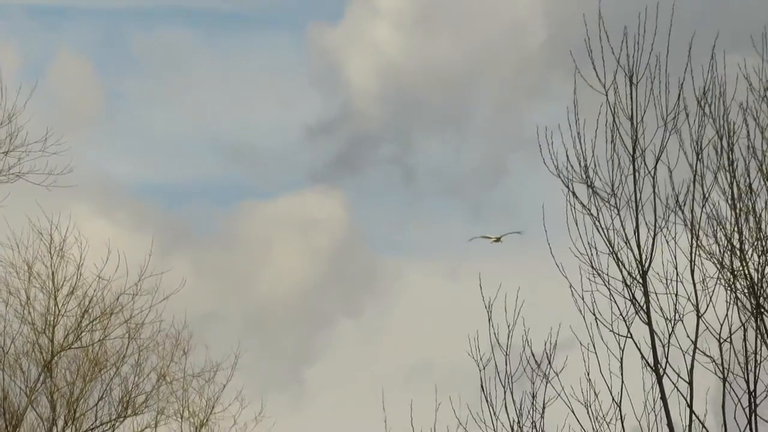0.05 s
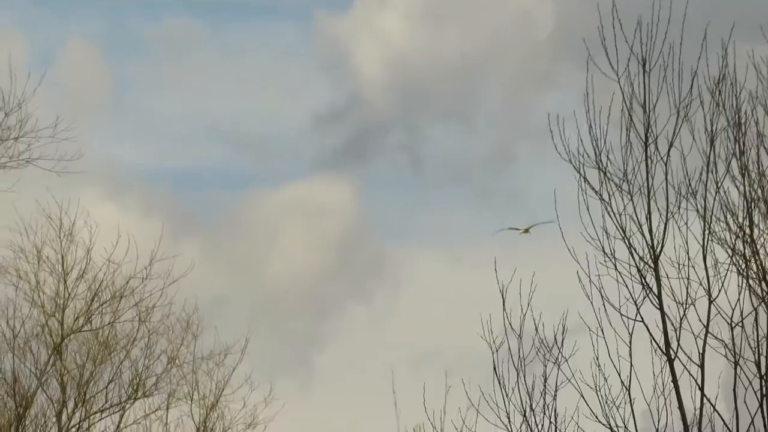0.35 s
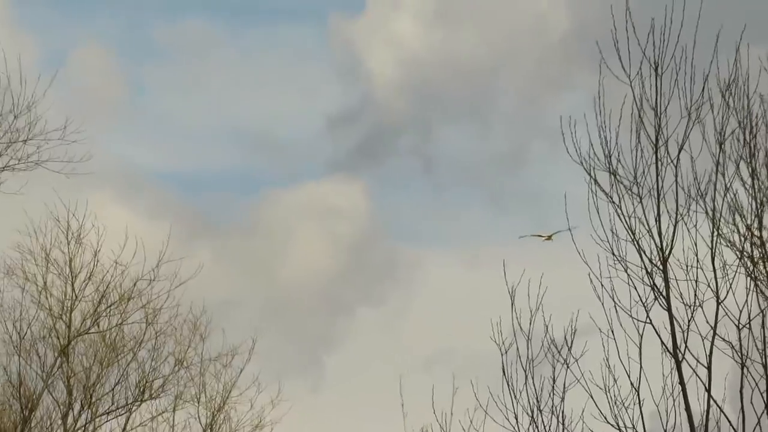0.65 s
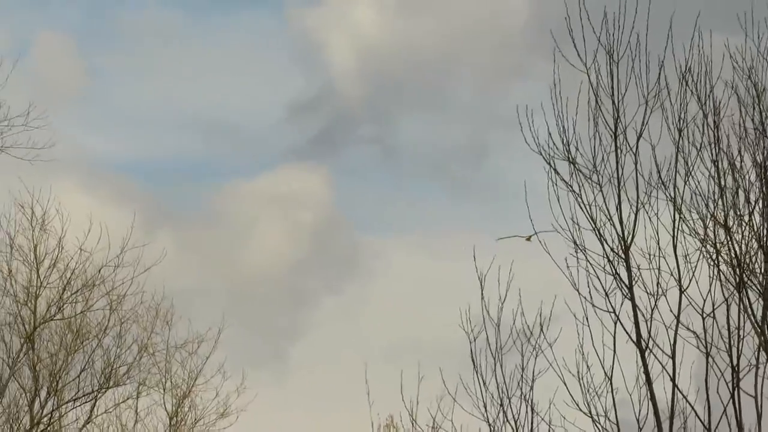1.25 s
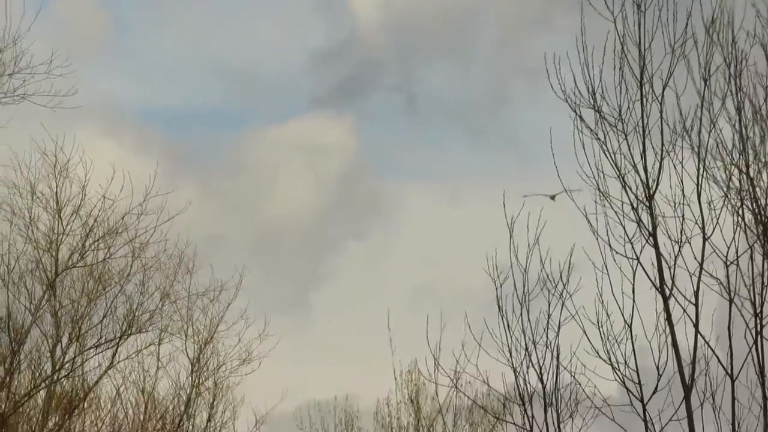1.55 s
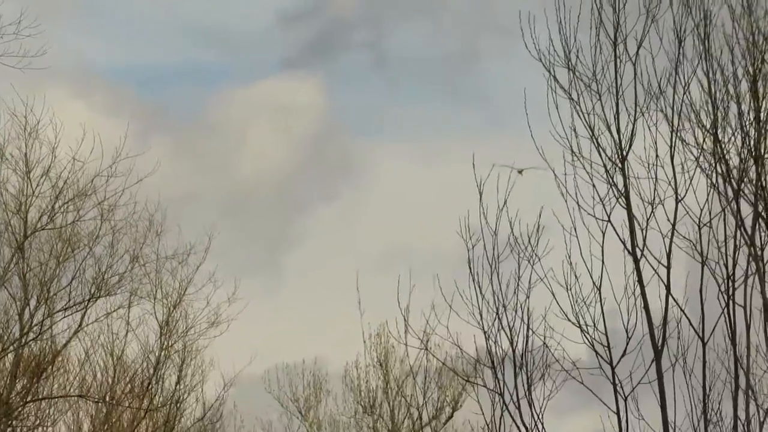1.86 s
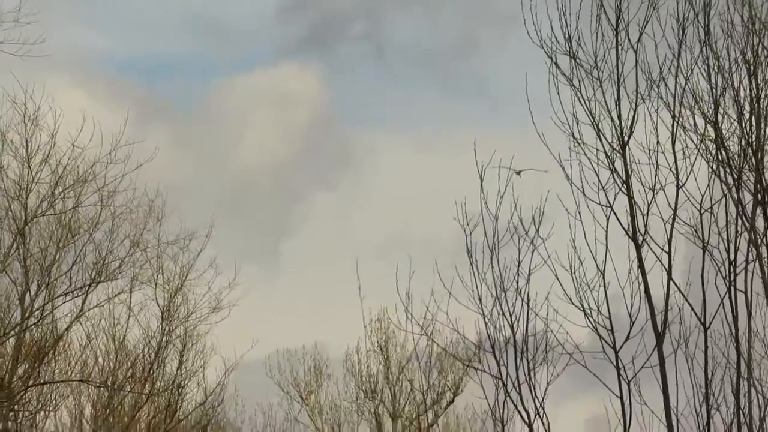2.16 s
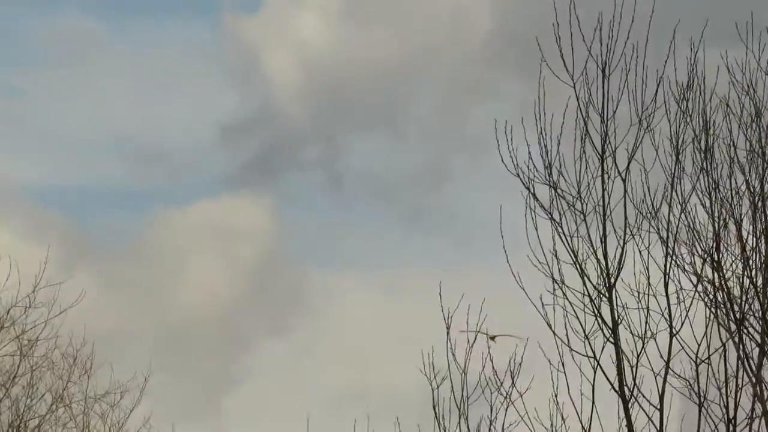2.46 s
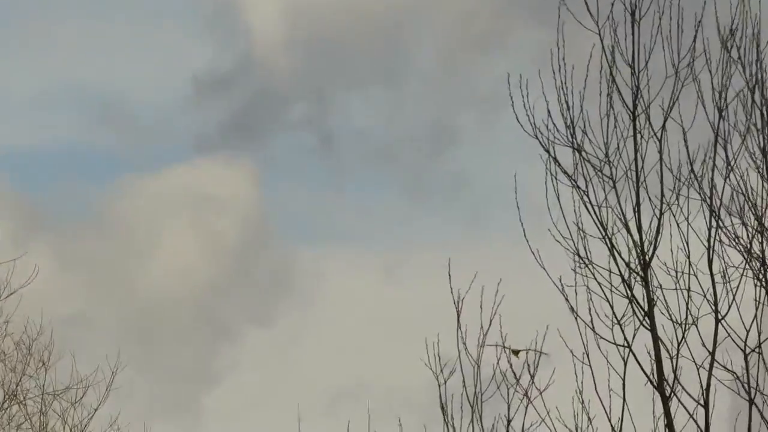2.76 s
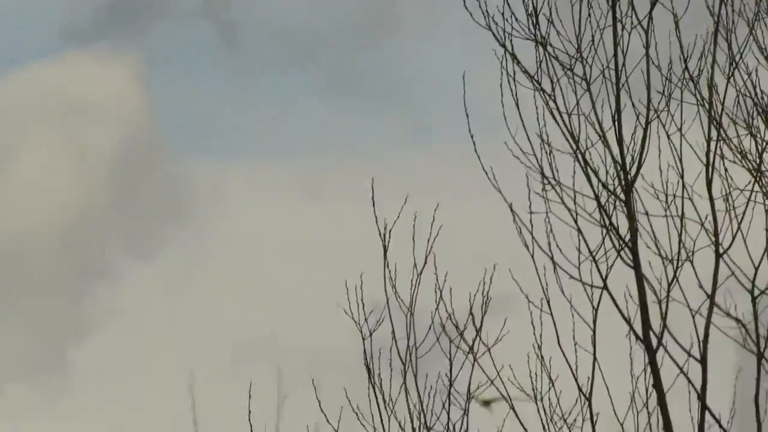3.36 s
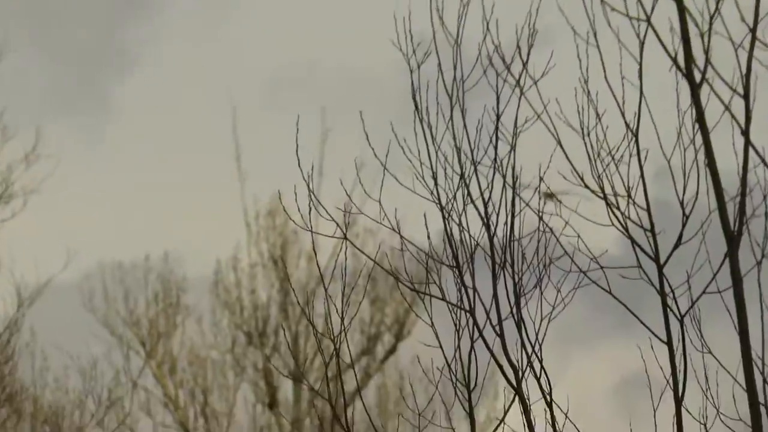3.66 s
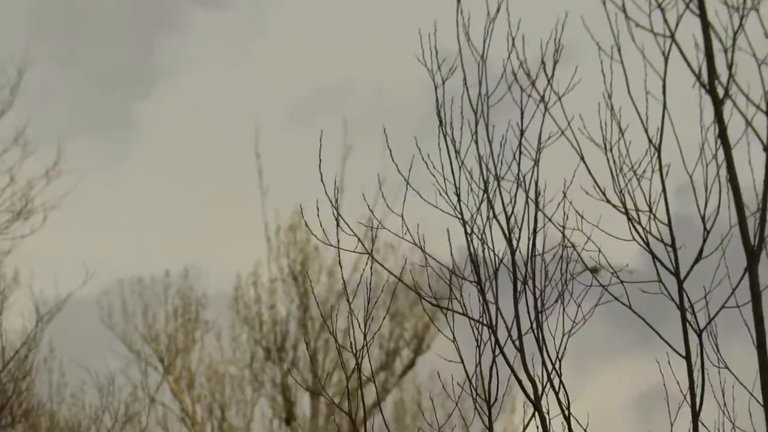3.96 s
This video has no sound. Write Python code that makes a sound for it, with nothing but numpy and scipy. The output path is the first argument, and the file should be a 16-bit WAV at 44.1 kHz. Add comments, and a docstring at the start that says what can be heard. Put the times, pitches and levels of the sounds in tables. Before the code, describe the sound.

Birds call among bare trees: a small one close by gives sharp chirps, then a run of ticks, while a distant one repeats a low falling call. Thin whistles and a brief trill sit over a steady far-off rush.

```python
"""A small bird close by scolds in sharp chips, later ticks: steep down-sweeps shaped by its beak.
Among bare trees, a distant bird repeats a low falling call that echoes off the tree line.
Other birds add thin whistles, a fast trill and rising slurs, all gliding tones.
Under it lie a steady far-off rush, a few soft bumps, a light ringing knock and a faint hiss."""
import sys
import numpy as np
from scipy import signal
from scipy.fft import rfft, irfft
from scipy.io import wavfile

SR = 44100
rng = np.random.default_rng(int(sys.argv[2]) if len(sys.argv) > 2 else 0)


def store_pcm(level_fs):
    """Save levels as 16-bit WAV."""
    pcm = np.round(np.clip(level_fs, -1, 1) * 32767).astype(np.int16)
    wavfile.write(sys.argv[1], SR, np.atleast_2d(pcm).T)


N = 176400

# Far whistles. Each row: start and length in seconds, first, middle and last pitch in Hz,
# level in dB, waver as a share of pitch.
WHISTLES = [(-.02, 0.12, 1120, 1012, 940, -39, 0.081), (0.072, 0.22, 1012, 969, 963, -51.5, 0.02),
            (.1, 0.92, 845, 827.5, 830, -55, 0.024), (0.163, 0.36, 1440, 1437, 1430, -53, 0.012),
            (0.572, 0.11, 1430, 1398, 1392, -42.5, 0.01), (0.941, 0.11, 7300, 6710, 6810, -45.5, 0.012),
            (1.038, 0.068, 6420, 5720, 5100, -49.5, 0.16), (0.98, 0.027, 3800, 4200, 4700, -55.5, .02),
            (1.015, .16, 1600, 1707, 1610, -51, 0.019), (3.04, 0.085, 900, 943, 976, -45, 0.0094),
            (3.844, 0.14, 7300, 7090, 7250, -51, .008), (3.926, 0.044, 3500, 3920, 4200, -55.5, 0.0059)]
# Rush spectrum. Each row: frequency in Hz, relative level in dB.
RUSH_SPECTRUM = [(20, -26.5), (45, -15.5), (80, -1), (160, 1), (290, -2), (440, 3.5), (700, -1), (1100, 4),
                 (1800, -8), (3200, -12), (4500, -24.5), (6500, -34.5), (10000, -42.5), (15000, -52)]
# Rush stereo width. Each row: frequency in Hz, side against mid in dB.
RUSH_WIDTH = [(60, -24.5), (280, -13.5), (800, -12), (2000, -10.5), (4000, -10), (7000, 3.5)]
# Hiss spectrum. Each row: frequency in Hz, relative level in dB.
HISS_SPECTRUM = [(1500, 1), (4000, 3.5), (8000, -7.5), (13000, -15.5), (16000, -15)]
# Hiss envelope. Each row: time in seconds, level in dB.
HISS_LEVELS = [(0, -77), (2.1, -94), (2.4, -58), (3.2, -59.5), (4, -61)]
# Scolding chips. Each row: start and length in seconds, starting pitch in Hz, level before the beak
# in dB, relative octave level in dB, nearest reflection delay in ms.
CHIPS = [(.0733, .019, 3130, -23, -3.5, 2.1), (0.1227, .018, 3370, -26, 1.5, 3.15),
         (0.246, .016, 3180, -24.5, 0, 2.72), (0.2947, .019, 3444, -25, 1, 2.2),
         (1.3264, .016, 3225, -26, 1.5, 3.1), (1.385, .015, 3444, -27.5, 1, 2.8),
         (1.585, .014, 2983, -31.5, -2.5, 4), (1.6168, .014, 3365, -29, 4.5, 2.5),
         (2.255, 0.012, 3250, -32.5, -.5, 4.3), (2.2918, 0.0093, 3350, -30.5, 1, 3)]
# Scolding ticks. Each row: start and length in seconds, level before the beak in dB.
TICKS = [(2.347, 0.006, -36.5), (2.376, 0.0098, -37.5), (2.419, 0.006, -36), (2.44, 0.0027, -37),
         (2.464, 0.002, -32), (2.497, .009, -27.5), (2.5477, 0.0099, -28.5), (2.586, 0.013, -30.5),
         (2.6368, 0.0057, -25.5), (2.682, 0.013, -29), (2.74, 0.0084, -27), (2.78, 0.0078, -26),
         (2.83, 0.0092, -24)]
# Throat and beak response. Each row: frequency in Hz, gain in dB.
BEAK_RESPONSE = [(1400, -8.5), (2100, -28), (2750, -3), (3400, -4.5), (4400, -3.5), (5300, -7),
                 (6000, -5.5), (6600, -9), (7400, -22), (11500, -15.5)]
# Ground and branch reflections. Each row: delay in seconds, gain in dB.
NEAR_ECHOES = [(.0046, -10), (.0072, -12)]
# Bumps and clicks. Each row: start and decay scale in seconds, centre in Hz, level in dB.
BUMPS = [(0.159, 0.018, 109, -36.5), (0.358, 0.12, 91, -41), (0.911, 0.0079, 121, -31),
         (0.979, 0.014, 347, -28.5), (1.964, 0.013, 105, -33), (3.201, 0.0076, 3130, -40.5),
         (3.34, 0.042, 85, -43.5), (3.497, 0.016, 380, -35.5)]
# Low calls. Each row: start and length in seconds, starting pitch and main fall in Hz,
# level after the swell in dB, swell in dB, rasp as a share of pitch.
CALLS = [(.366, .05, 1290, 130, -31.5, 1, .014), (.592, .07, 1215, 135, -29.5, 4.5, .014),
         (.860, .087, 1220, 150, -29, 6, .014), (1.142, .088, 1245, 165, -28, 4.5, .014),
         (1.432, .082, 1240, 155, -28.5, 6, .014), (1.722, .083, 1245, 160, -28.5, 5, .014),
         (2.014, .085, 1240, 150, -29.5, 4.5, .018), (2.308, .185, 1215, 100, -36.5, 0, .035),
         (2.618, .078, 1230, 145, -29.5, 4.5, .014), (2.932, .085, 1215, 140, -29.5, 4.5, .014),
         (3.250, .092, 1200, 115, -29.5, 4.5, .018), (3.600, .1, 1190, 105, -29.5, 5, .018)]
# Call harmonics 1 to 3. Each entry: relative level in dB before the overtone swell.
CALL_HARMONICS_DB = [-1, -21, -21]
# Tree line echoes. Each row: delay in seconds, gain in dB.
TREE_ECHOES = [(.045, -19), (.092, -10), (.16, -19)]
# High notes after some calls. Each row: start and length in seconds, final pitch in Hz, level in dB.
TRAILS = [(0.683, 0.061, 3210, -50.5), (0.969, .065, 3180, -49), (1.247, 0.07, 3200, -49.5),
          (3.033, 0.071, 3150, -46.5), (3.333, .115, 3000, -47.5), (3.676, .14, 3070, -49.5)]
# Trill envelope. Each row: time in seconds, level in dB.
TRILL_LEVELS = [(1.38, -58), (1.5, -52.5), (1.68, -45), (1.8, -44.5), (1.95, -42.5), (2.08, -45),
                (2.13, -51), (2.22, -60), (2.42, -48), (2.5, -60)]
# Rising slurs. Each row: start in seconds, first and last pitch in Hz, starting level in dB.
SLURS = [(1.453, 4320, 6200, -55), (1.577, 4200, 6750, -46.5), (1.703, 4060, 6750, -49),
         (1.827, 4050, 6350, -49.5), (1.956, 3450, 6580, -45), (2.074, 3600, 6410, -45),
         (2.203, 3440, 6740, -43)]
# Knock modes. Each row: frequency in Hz, T60 in seconds, level in dB.
KNOCK_MODES = [(870, 0.049, -32), (1072, 0.052, -29), (1350, 0.043, -27.5), (1800, 0.052, -31.5),
               (3440, .04, -36)]
# Microphone port phase. Each row: frequency in Hz, lead of left over right in radians.
PORT_PHASE = [(100, 0), (1200, .22), (2300, .47), (3550, .27), (3980, -.38), (4330, -.23), (4950, -.7),
              (5450, -2.2), (6100, -3.25), (6700, -3.38), (7500, -3.15)]


def undb(db):
    """Decibels to gain."""
    return 10 ** (np.asarray(db) / 20)


def curve(at, points):
    """Linear table lookup."""
    return np.interp(at, *np.array(points, float).T)


def over_hz(hz, points):
    """Table lookup on a log frequency axis."""
    p = np.array(points, float)
    return np.interp(np.log(np.maximum(hz, 1)), np.log(p[:, 0]), p[:, 1])


def noise(spectrum):
    """Shaped noise, unit RMS."""
    x = irfft(rfft(rng.standard_normal(N)) * undb(over_hz(np.fft.rfftfreq(N, 1 / SR), spectrum)), N)
    return x / x.std()


def walk(rate_hz, n=N):
    """Random drift, spread near 1."""
    knots = rng.standard_normal(1024)
    return np.interp(np.arange(n) / SR * rate_hz, np.arange(len(knots)), knots)


def add(out, start_s, x):
    """Mix x in at start_s."""
    i = int(round(start_s * SR))
    x = x[max(-i, 0):max(N - i, 0)]
    out[max(i, 0):max(i, 0) + len(x)] += x


def span(length_s):
    """Note progress, 0 to 1."""
    return np.linspace(0, 1, max(int(length_s * SR), 2))


def gate(u, attack, release):
    """Smooth rise and fall, as shares of the note."""
    rise = np.sin(np.pi / 2 * np.clip(u / attack, 0, 1))
    fall = np.sin(np.pi / 2 * np.clip((1 - u) / release, 0, 1))
    return rise * fall


def tone(hz):
    """Gliding sine, unit RMS."""
    return np.sqrt(2) * np.sin(2 * np.pi * np.cumsum(hz) / SR)


def echoes(x, taps):
    """Sum of delayed reflections."""
    i = np.arange(N)
    return sum(undb(db) * np.interp(i - delay_s * SR, i, x, left=0) for delay_s, db in taps)


def scatter(x, t60_s, side_db):
    """Diffuse stereo reflections from trunks and twigs."""
    age = np.arange(SR) / SR / t60_s
    mid, side = rng.standard_normal((2, SR)) * 1000 ** -age * (1 - np.exp(-20 * age))
    impulse = (mid + undb(side_db) * np.array([side, -side])) / np.sqrt(np.sum(mid ** 2))
    return signal.fftconvolve(x[None], impulse, axes=1)[:, :N]


def far_whistles():
    """Thin wavering whistles, blurred by the trees."""
    out = np.zeros(N)
    for start_s, length_s, first_hz, middle_hz, last_hz, db, waver in WHISTLES:
        u = span(length_s)
        arc_hz = np.polyval(np.polyfit([0, .5, 1], [first_hz, middle_hz, last_hz], 2), u)
        hz = arc_hz * (1 + waver * walk(middle_hz / 6, len(u)))
        add(out, start_s, tone(hz) * gate(u, .09, .15) * undb(db))
    return out + undb(-2) * scatter(out, t60_s=.21, side_db=-16)


def background():
    """Far-off rush, wider in the treble, and a faint hiss that rises past halfway."""
    mid, side = noise(RUSH_SPECTRUM), noise(RUSH_SPECTRUM)
    side = irfft(rfft(side) * undb(over_hz(np.fft.rfftfreq(N, 1 / SR), RUSH_WIDTH)), N)
    rush = (mid + np.array([side, -side])) * undb(-41.7 + .8 * walk(rate_hz=5.593))
    hiss = np.array([noise(HISS_SPECTRUM), noise(HISS_SPECTRUM)])
    return rush + hiss * undb(curve(np.arange(N) / SR, HISS_LEVELS))


def beak(hz):
    """A tone shaped by throat and beak."""
    return tone(hz) * undb(over_hz(hz, BEAK_RESPONSE))


def with_branch_echo(x, delay_ms, echo_db=-5):
    """A note plus one reflection from a nearby branch."""
    gap = np.zeros(max(int(round(delay_ms / 1000 * SR)), 1))
    return np.concatenate([x, gap]) + undb(echo_db) * np.concatenate([gap, x])


def scolder(chip_fall_ratio=.44, tick_top_hz=7070, tick_end_hz=2234, rasp=.056):
    """Steep raspy down-sweeps close by: chips with overtones, then ticks without."""
    out = np.zeros(N)
    for start_s, length_s, top_hz, db, octave_db, echo_ms in CHIPS:
        u = span(length_s)
        hz = top_hz * chip_fall_ratio ** u * (1 + rasp * walk(1520, len(u)))
        voice = beak(hz) + undb(octave_db) * beak(2 * hz) + undb(-19) * beak(3 * hz)
        edge = undb(-34) * (tone(4 * hz) + tone(6 * hz))
        chip = (voice + edge) * gate(u, .1, .33) * undb(db)
        add(out, start_s, with_branch_echo(chip, echo_ms))
    for start_s, length_s, db in TICKS:
        u = span(length_s)
        hz = tick_top_hz * (tick_end_hz / tick_top_hz) ** u * (1 + rasp * walk(1560, len(u)))
        tick = beak(hz) * gate(u, .11, .52) * undb(db)
        add(out, start_s, with_branch_echo(tick, delay_ms=rng.uniform(2, 4.6)))
    near = undb(-5.5) * scatter(out, t60_s=.055, side_db=-12)
    wood = undb(-19.5) * scatter(out, t60_s=.21, side_db=-17)
    return out + echoes(out, NEAR_ECHOES) + near + wood


def bumps(half_width_octaves=.34):
    """Band noise bursts: dull bumps and a twig-like click."""
    out = np.zeros(N)
    t = np.arange(SR // 4) / SR
    ratio = 2 ** half_width_octaves
    for start_s, decay_s, hz, db in BUMPS:
        band = [(hz / 8, -24), (hz / ratio, -3), (hz, 0), (hz * ratio, -5), (hz * 8, -36), (hz * 64, -80)]
        envelope = t / decay_s * np.exp(1 - 2 * t / decay_s)
        add(out, start_s, noise(band)[:len(t)] * envelope * undb(db))
    return out


def low_caller(end_drop_hz=35, overtone_swell_db=5, lead_hz=1230, lead_top_hz=1406, upper_hz=1482):
    """Each call slurs up, breaks to a swelling, falling tone and returns from the tree line."""
    out = np.zeros(N)
    for start_s, length_s, top_hz, fall_hz, db, swell_db, rasp in CALLS:
        u = span(length_s)
        hz = top_hz - fall_hz * (1 - (1 - u) ** 1.35) - end_drop_hz * u ** 10
        hz *= 1 + rasp * walk(400, len(u))
        overtone_db = overtone_swell_db * (2 * u - 1.5)
        voice = sum(undb(harmonic_db + (k > 1) * overtone_db) * tone(k * hz)
                    for k, harmonic_db in enumerate(CALL_HARMONICS_DB, 1))
        add(out, start_s, voice * gate(u, .12, .1) * undb(db + swell_db * (u - 1)))
        # Lead-in slur.
        u = span(length_s=.044)
        hz = lead_hz + (lead_top_hz - lead_hz) * u + 60 * walk(238, len(u))
        add(out, start_s - .044, tone(hz) * gate(u, .14, 1) * undb(db - 11))
        # Weak steady tone above the call.
        u = span(length_s=.13)
        hz = upper_hz + 26 * walk(143, len(u))
        add(out, start_s - .02, tone(hz) * gate(u, .049, .14) * undb(db - 18.5))
    return out + echoes(out, TREE_ECHOES) + undb(-3) * scatter(out, t60_s=.64, side_db=-15.5)


def trailing_notes(top_hz=3400, waver_hz=25):
    """Faint high falling tones after some calls."""
    out = np.zeros(N)
    for start_s, length_s, end_hz, db in TRAILS:
        u = span(length_s)
        hz = top_hz + (end_hz - top_hz) * u ** 1.5 + waver_hz * walk(408.5, len(u))
        add(out, start_s, tone(hz) * gate(u, .19, .25) * undb(db - 2.3 * u))
    return out + undb(-5) * scatter(out, t60_s=.15, side_db=-16)


def trill(rate_hz=152, top_hz=4680, low_hz=3000, waver_hz=110, flutter_db=1.5):
    """Tiny down-sweeps, repeated fast enough to buzz."""
    t = np.arange(N) / SR
    cycle = np.cumsum(rate_hz * (1 + .025 * walk(25))) / SR % 1
    hz = top_hz + (low_hz - top_hz) * cycle + waver_hz * walk(500)
    level_db = curve(t, TRILL_LEVELS) + flutter_db * walk(210)
    sounding = (t > TRILL_LEVELS[0][0]) & (t < TRILL_LEVELS[-1][0])
    return tone(hz) * gate(cycle, .28, .28) * undb(level_db) * sounding


def slurs(length_s=.043, waver_hz=170, swell_db=3.5, flutter_db=3):
    """A row of quick, swelling up-sweeps."""
    out = np.zeros(N)
    u = span(length_s)
    for start_s, first_hz, last_hz, db in SLURS:
        hz = first_hz + (last_hz - first_hz) * u + waver_hz * walk(530, len(u))
        level_db = db + swell_db * u + flutter_db * walk(220, len(u))
        add(out, start_s, tone(hz) * gate(u, .35, .15) * undb(level_db))
    return out


def knock(start_s=3.357, attack_s=.0013):
    """One light blow rings a few short modes."""
    out = np.zeros(N)
    t = np.arange(SR // 4) / SR
    ring = sum(undb(db) * np.sin(2 * np.pi * hz * t) * 1000 ** (-t / t60_s)
               for hz, t60_s, db in KNOCK_MODES)
    add(out, start_s, ring * (1 - np.exp(-t / attack_s)))
    return out


def scene():
    """Birds reach the two microphone ports out of phase in the treble, over the other sounds."""
    song = trill() + slurs()
    song = song + undb(-7) * scatter(song, t60_s=.07, side_db=-10)
    birds = far_whistles() + scolder() + low_caller() + trailing_notes() + song
    lead_rad = over_hz(np.fft.rfftfreq(2 * N, 1 / SR), PORT_PHASE)
    port_shift = np.exp(.5j * np.array([lead_rad, -lead_rad]))
    birds = irfft(rfft(birds, 2 * N) * port_shift)[:, :N]
    return birds + background() + bumps() + knock()


def record(dry):
    """Steep low-pass at 15.1 kHz."""
    return signal.sosfilt(signal.ellip(8, .2, 70, 15100, fs=SR, output="sos"), dry)


dry = scene()
out = record(dry)
store_pcm(out)
```